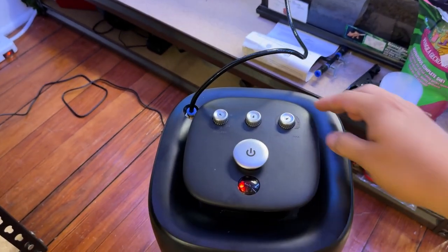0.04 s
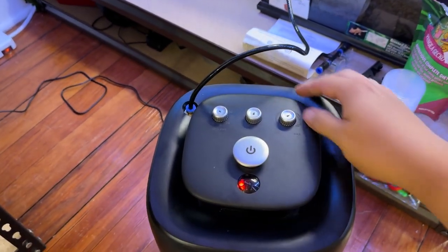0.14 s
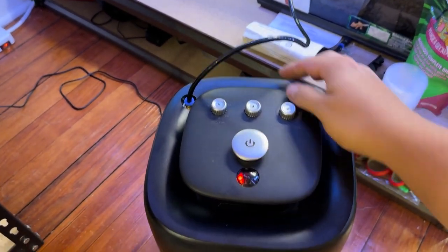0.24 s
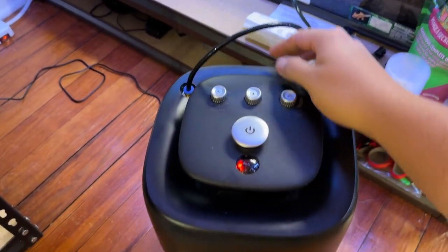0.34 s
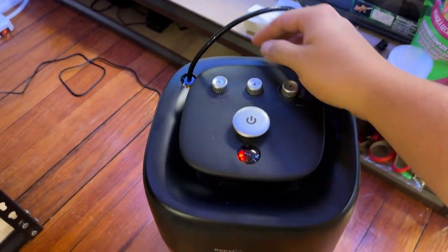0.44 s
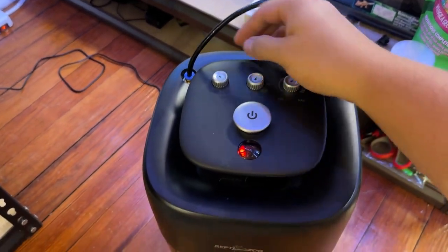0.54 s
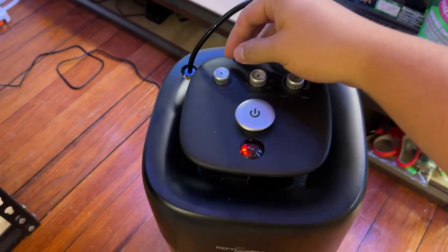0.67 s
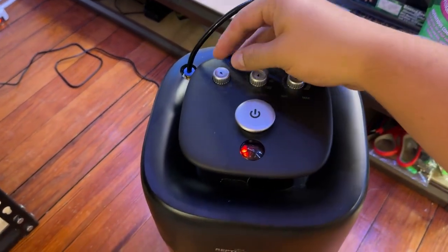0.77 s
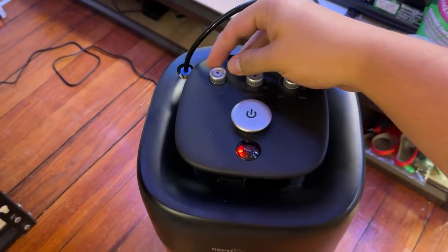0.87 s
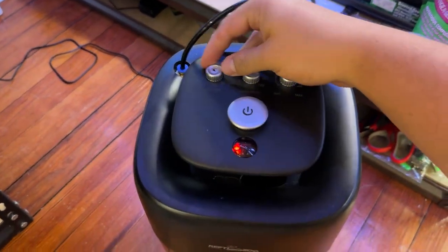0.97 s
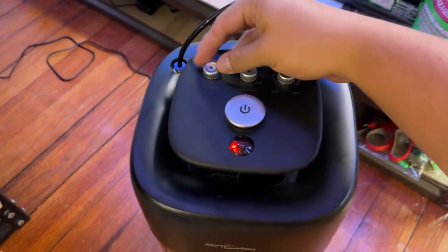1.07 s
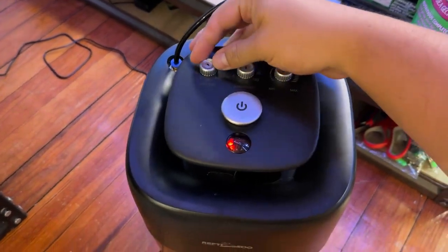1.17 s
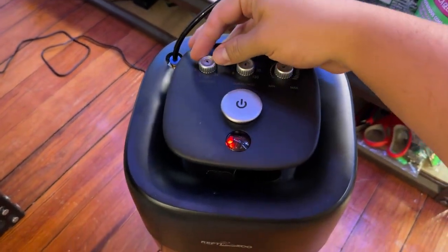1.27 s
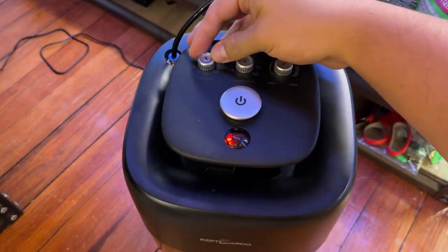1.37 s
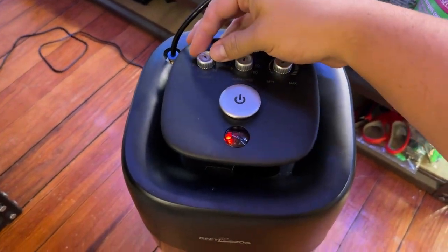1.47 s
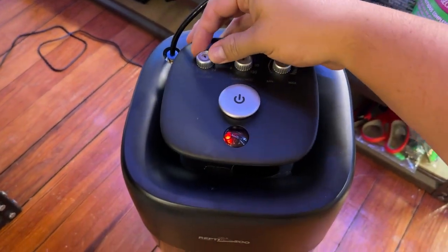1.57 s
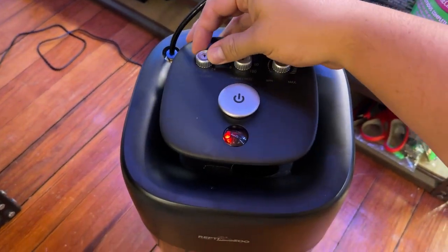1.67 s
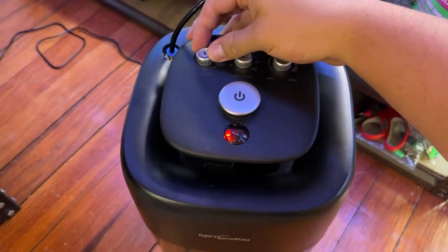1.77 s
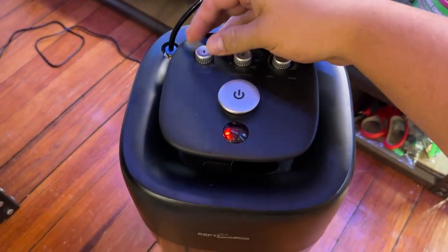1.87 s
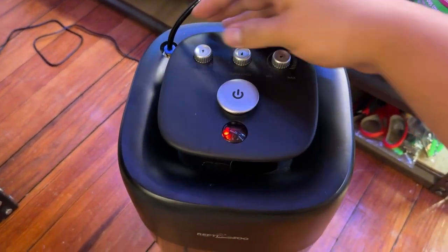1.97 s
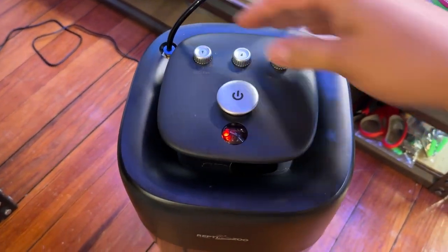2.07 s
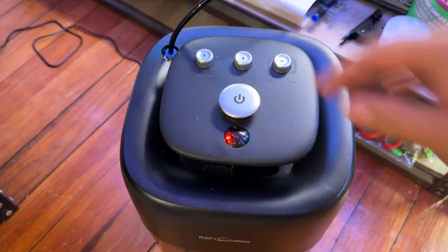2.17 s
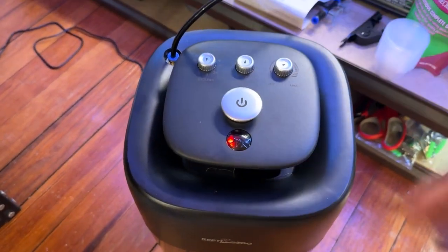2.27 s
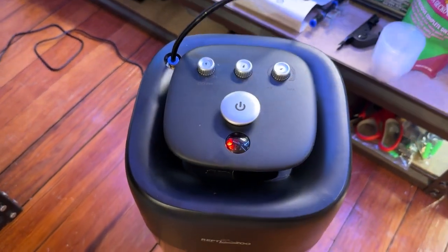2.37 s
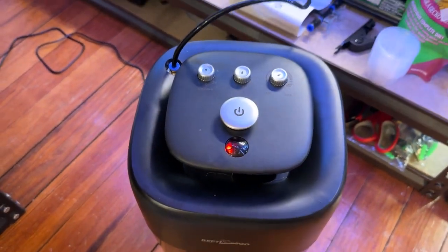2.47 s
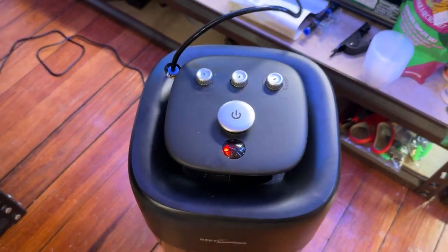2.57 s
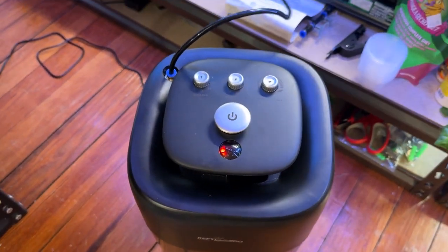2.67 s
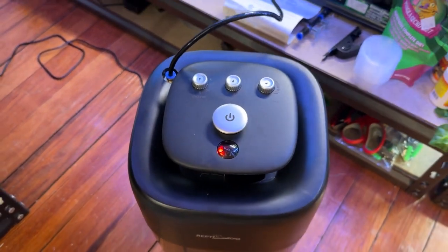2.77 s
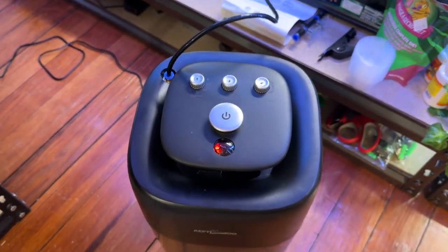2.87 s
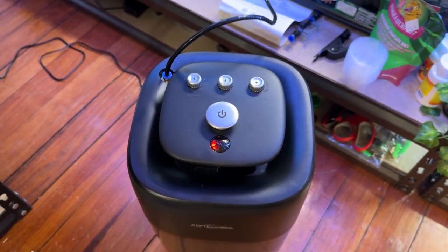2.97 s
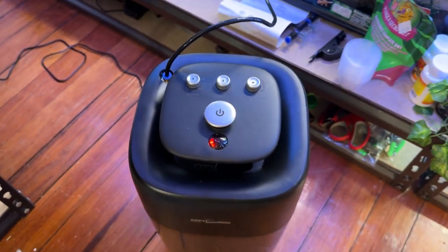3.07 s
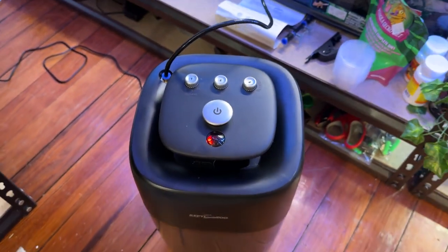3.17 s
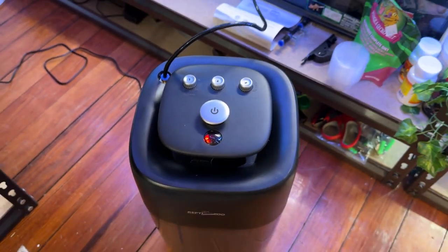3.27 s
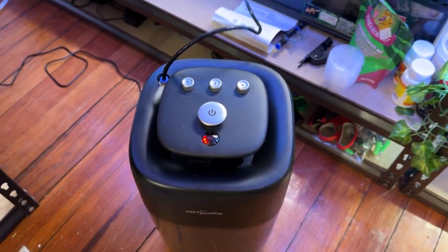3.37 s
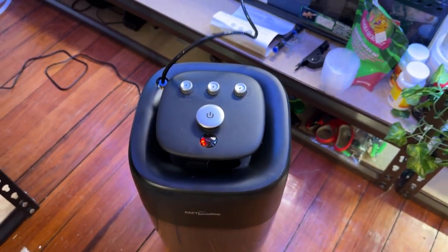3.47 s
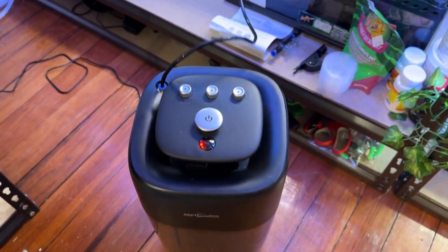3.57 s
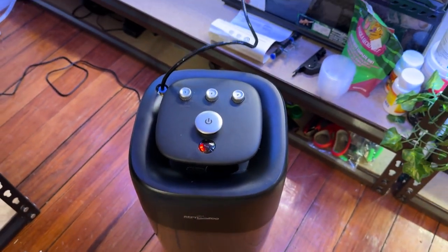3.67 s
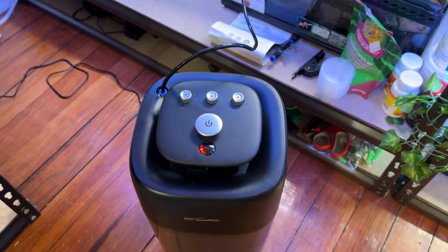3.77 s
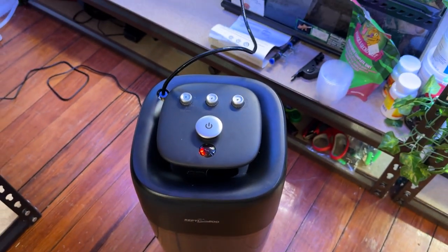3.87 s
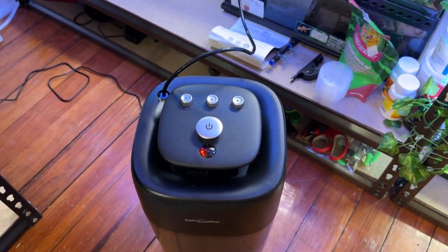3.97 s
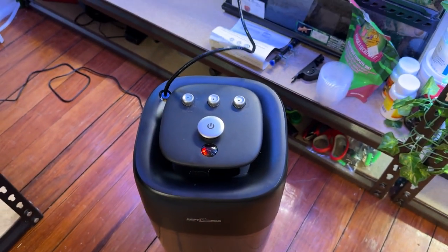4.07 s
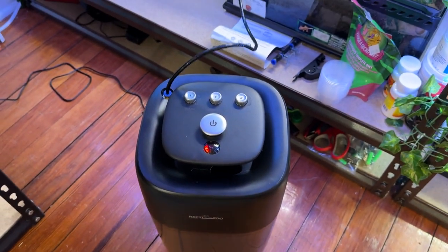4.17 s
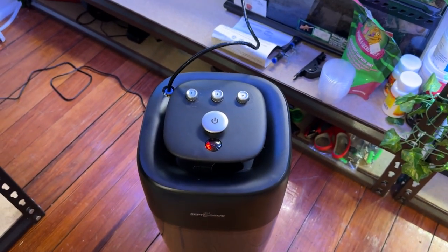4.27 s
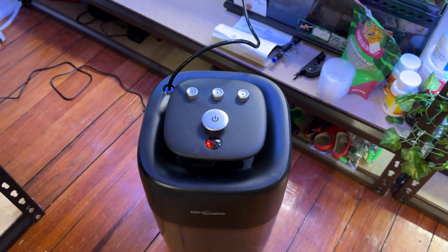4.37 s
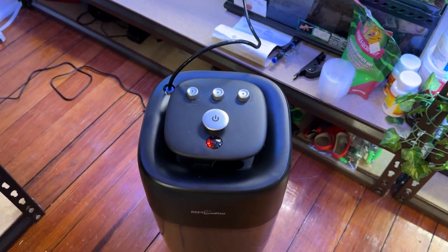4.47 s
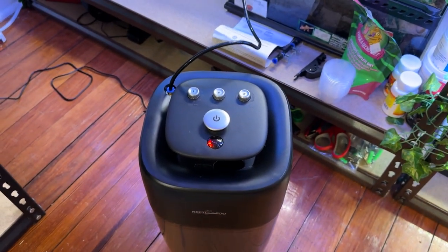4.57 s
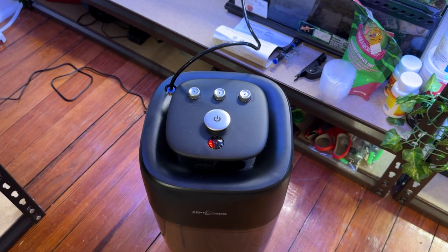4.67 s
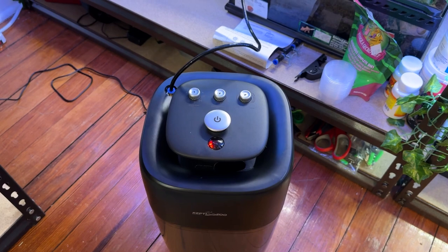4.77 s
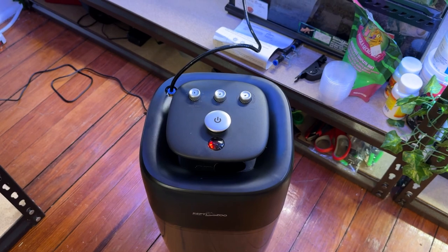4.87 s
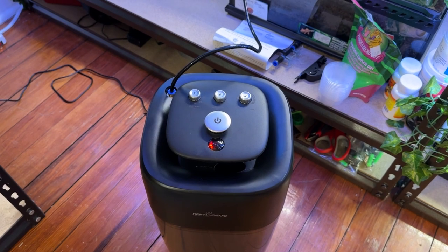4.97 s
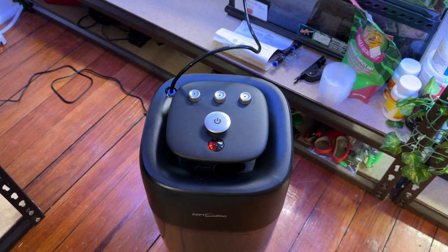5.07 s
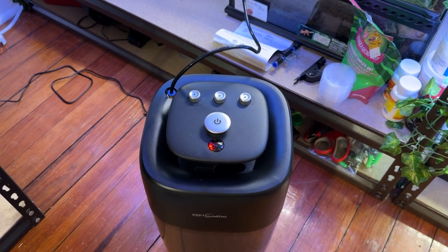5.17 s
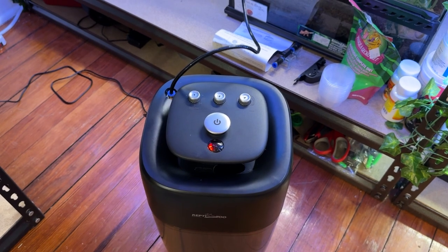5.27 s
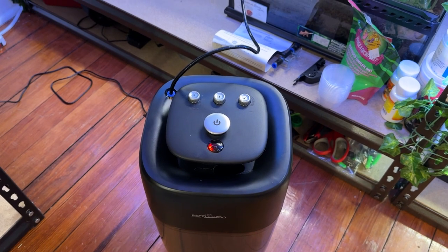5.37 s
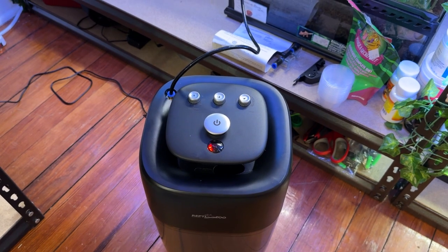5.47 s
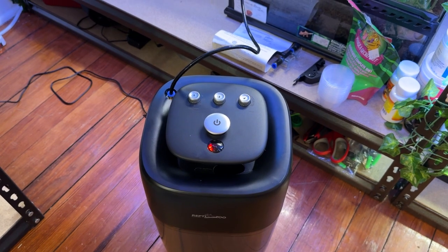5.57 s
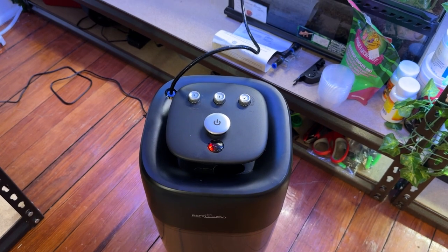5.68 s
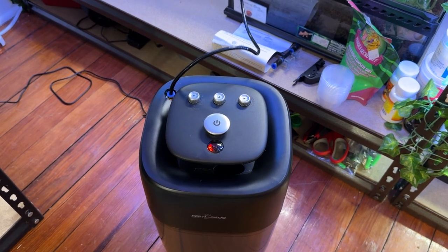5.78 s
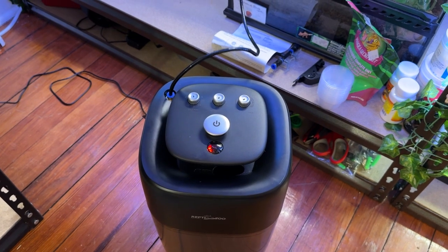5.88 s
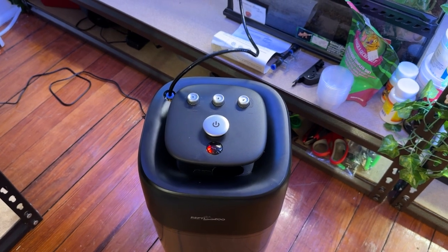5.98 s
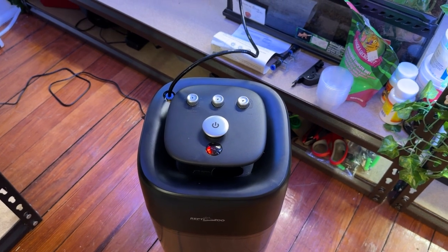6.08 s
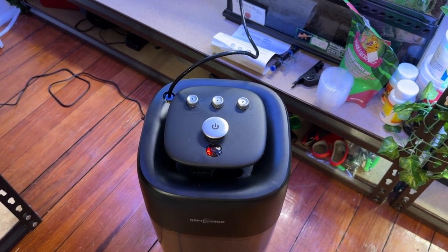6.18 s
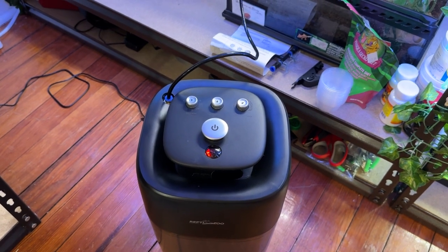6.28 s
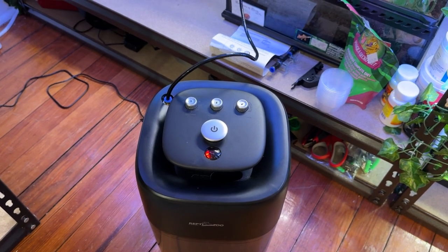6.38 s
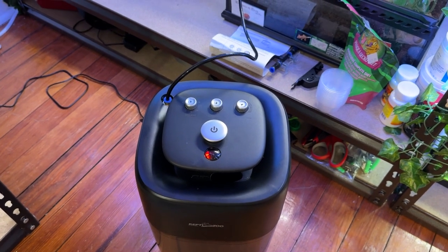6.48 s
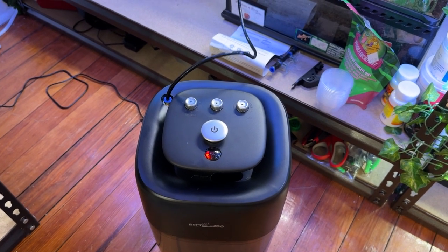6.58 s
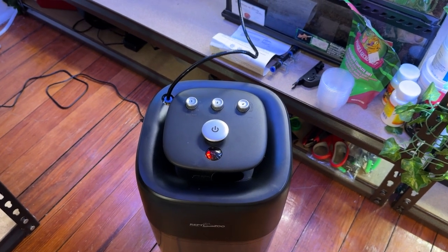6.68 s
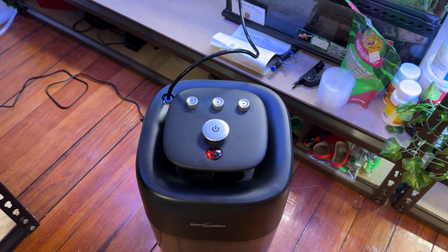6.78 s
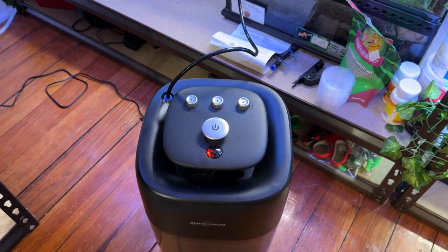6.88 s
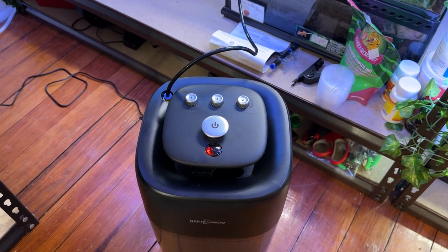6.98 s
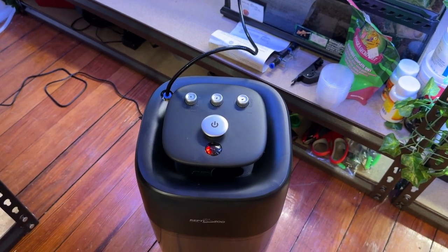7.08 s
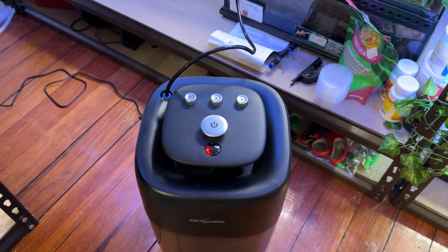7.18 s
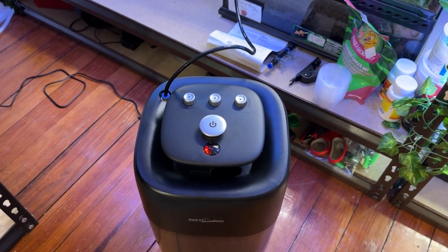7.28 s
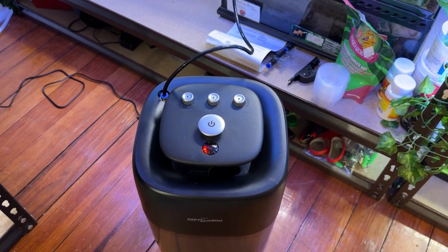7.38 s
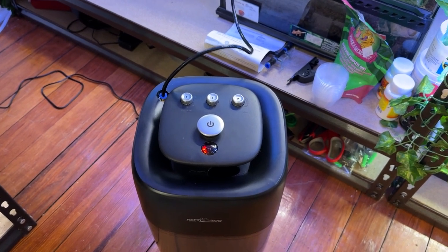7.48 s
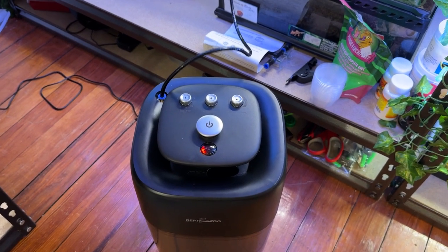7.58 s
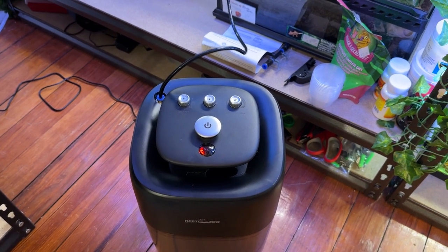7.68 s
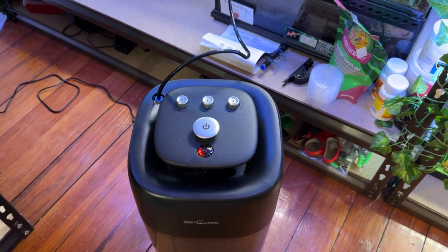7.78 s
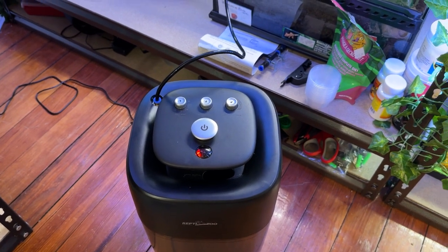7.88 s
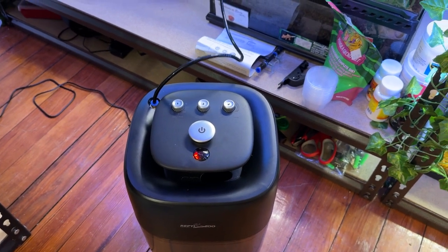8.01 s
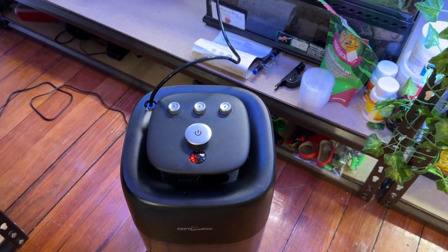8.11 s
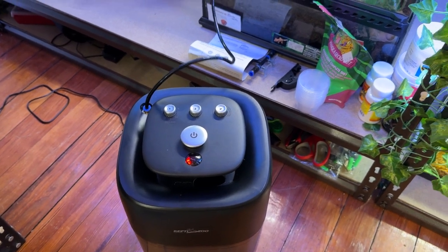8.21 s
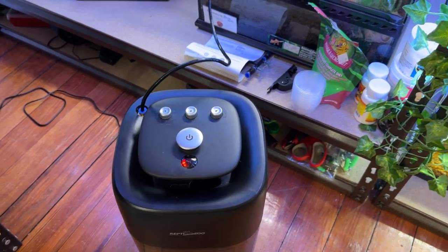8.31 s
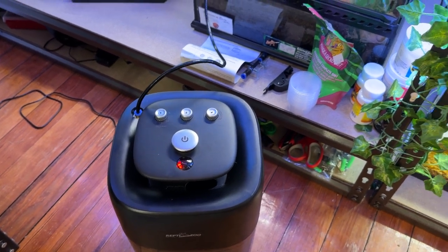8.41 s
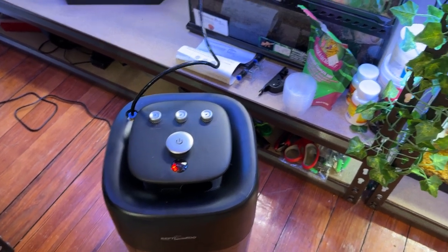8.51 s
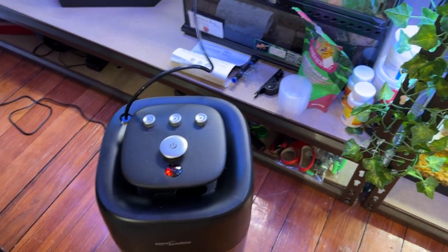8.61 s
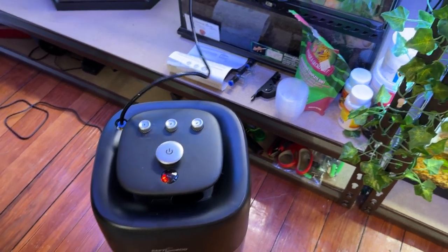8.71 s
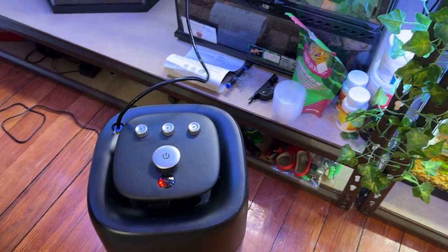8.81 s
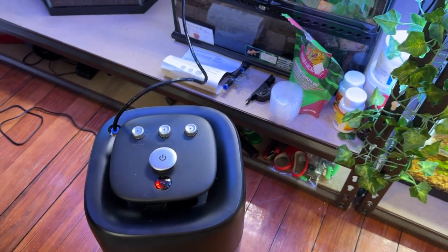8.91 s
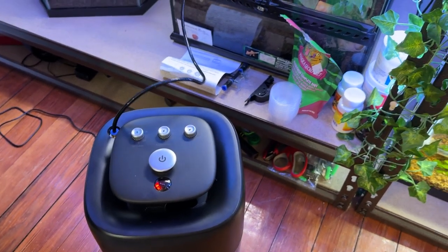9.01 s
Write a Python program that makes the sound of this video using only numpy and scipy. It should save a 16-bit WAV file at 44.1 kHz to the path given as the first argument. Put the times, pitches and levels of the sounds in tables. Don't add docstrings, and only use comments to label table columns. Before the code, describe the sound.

A small water pump in a plastic tub, heard close indoors. Quiet hum, tiny drips and light handling come first, then a crisp double clack and a dull jolt as the motor kicks in. Loose parts rattle for a second over a steady buzzing drone with light water trickling. After six seconds short spits of air and water become a continuous fine spray, with a soft thump near eight seconds and heavier pump knocking.

```python
import sys
import numpy as np
from scipy import signal
from scipy.fft import rfft
from scipy.io import wavfile
from scipy.ndimage import uniform_filter1d

SR = 44100
rng = np.random.default_rng(int(sys.argv[2]) if len(sys.argv) > 2 else 0)


def convert_level_to_amplitude(level_db):
    exponent = np.asarray(level_db, float) / 20
    return 10 ** exponent


def materialize(psi):
    bounded = np.clip(np.atleast_2d(psi).T, -1, 1)
    quanta = np.round(bounded * 32767).astype(np.int16)
    wavfile.write(sys.argv[1], SR, quanta)


N = 399105
TIME = np.arange(N) / SR

# pitch_hz, likeness (0 to 1)
SAME = [(60, 0.96), (130, 0.93), (290, 0.93), (640, 0.54), (1410, 0.25), (3100, 0.099), (6500, 0.1),
        (10000, 0.55)]
# pitch_hz, left_over_right_db
TILT = [(130, 1), (290, 1.5), (640, 1.0), (1410, 4), (3100, 5.5), (5500, 6), (8500, 2), (12000, -0.5)]
# time_s, distance_m
DISTANCE = [(0, 0.66), (2.55, 0.65), (3.7, 0.93), (9.05, 0.99)]
# time_s, turns_per_s
SPEED = [(1.9, 10.2), (3.0, 10.9), (6.3, 10.9), (7.0, 10.4), (7.64, 10.0), (8.0, 9.8), (8.257, 8.9),
         (8.4, 8.5), (9.05, 8.5)]


def evened(x):
    return x / np.sqrt(np.mean(x ** 2) + 1e-20)


def read(points, hz):
    f, value = np.transpose(points)
    return np.interp(np.log(hz + 1), np.log(f + 1), value)


def columns(rows):
    s, value = np.transpose(rows)
    return np.interp(TIME, s, value)


def banded(x, lo_hz, hi_hz):
    hz = np.fft.rfftfreq(N, 1 / SR)
    power = abs(rfft(x.mean(0))) ** 2 * (hz > lo_hz) * (hz < hi_hz)
    return x / np.sqrt(2 * power.sum() / N ** 2)


def slow(top_hz):
    t = TIME[::64]
    rates = np.geomspace(top_hz / 8, top_hz, num=20)
    waves = sum(np.sin(2 * np.pi * (f * t + rng.random())) for f in rates)
    return np.interp(TIME, t, evened(waves))


def resonate(x, hz, width):
    r = np.exp(-np.pi * width / SR)
    return 2 * signal.lfilter([1 - r], [1, -r * np.exp(2j * np.pi * hz / SR)], x).real


def panned(x, pan_db):
    return np.array([x * convert_level_to_amplitude(pan_db / 2), x * convert_level_to_amplitude(-pan_db / 2)])


def add(mix, s, sound):
    part = mix[..., round(s * SR):][..., :sound.shape[-1]]
    part += sound[..., :part.shape[-1]]


def noise(spectrum, same, patchy_db, size=1024, lag=((0, 0), (1, 0)), splash=0.):
    frames, hz = 4 * N // size + 5, np.fft.rfftfreq(size, 1 / SR)
    a, b, c, d, patches, chance = rng.standard_normal((frames, len(hz), 6)).T
    patches = uniform_filter1d(patches, size // 90, 0)
    patches = evened(uniform_filter1d(patches, 8000 // size, 1))
    drops = uniform_filter1d((chance > 2.9) * (1 + abs(c)), 15, 0)
    drops = uniform_filter1d(drops, 9, 0)
    drops = signal.lfilter([1], [1, -.85], drops, axis=1)
    like = np.clip(read(same, hz), -1, 1)[:, None]
    tilt = read(TILT, hz)[:, None]
    left = a + 1j * b
    right = like * left + np.sqrt(1 - like ** 2) * (c + 1j * d)
    turn = np.exp(1j * np.interp(hz, *np.transpose(lag)))[:, None]
    z = np.array([left * turn * convert_level_to_amplitude(tilt / 2), right * convert_level_to_amplitude(-tilt / 2)])
    z *= convert_level_to_amplitude(read(spectrum, hz)[:, None] + patchy_db * patches)
    z *= np.sqrt(1 + splash * drops / drops.mean())
    return signal.istft(z, nperseg=size, noverlap=size * 3 // 4)[1][:, :N]


def scuff(hz, width, count, like):
    raw = rng.standard_normal((2, count))
    a, b = (evened(resonate(resonate(v, hz, width), hz, 1.3 * width)) for v in raw)
    shared = panned(a, read(TILT, hz)) * [[1], [like]]
    return shared + [[0], [np.sqrt(1 - min(like, 1) ** 2)]] * b


def grainy(per_s, spread_db):
    size = convert_level_to_amplitude(spread_db * np.minimum(rng.exponential(1, N), 5)) * (rng.random(N) < per_s / SR)
    power = signal.oaconvolve(size ** 2, np.exp(-TIME[:1500] / 0.012))[:N]
    return evened(np.sqrt(0.11 + power))


def running():
    start_s, spin_up_s = 1.855, 0.052
    return np.clip((TIME - start_s) / spin_up_s, 0, 1)


def load():
    free_speed, loaded_speed = 10.9, 8.5
    return np.clip((free_speed - columns(SPEED)) / (free_speed - loaded_speed), 0, 1)


def squeaks():
    # start_s, length_s, level_db, pitch_hz
    creaks = [
        (.37, 0.38, -65, 1235),
        (.66, .2, -75, 1290),
        (0.86, 0.13, -70, 1290),
    ]
    glide_hz_per_s, width_hz = 148, 32
    out = np.zeros((2, N))
    fuzz = rng.standard_normal(N) + 1j * rng.standard_normal(N)
    fuzz = resonate(fuzz.real, 0, width_hz) + 1j * resonate(fuzz.imag, 0, width_hz)
    for s, length, db, hz in creaks:
        t = TIME[:round(length * SR)]
        tone = (fuzz[:len(t)] * np.exp(2j * np.pi * (hz * t + glide_hz_per_s * t ** 2 / 2))).real
        add(out, s, panned(convert_level_to_amplitude(db) * np.sin(np.pi * t / length) ** 1.2 * evened(tone), 7.0))
    return out


def room():
    # pitch_hz, level_db per Hz
    air = [(88, -29), (150, 5), (188, -14), (247, -4.5), (534, -16.5), (638, -21.5), (702, -26), (880, -23),
           (1810, -20.5), (3130, -29), (4610, -36), (5070, -54), (7000, -48), (9100, -80), (15400, -120)]
    # pitch_hz, level_db per Hz
    rumble = [(22, -22), (33, -15), (42, 12.5), (53, 11), (72, 5), (85, 8.5), (100, -0.5), (135, 6),
              (170, -13.5), (220, -35), (400, -72), (900, -130)]
    # pitch_hz, level_db, wavering_db
    hum = [(59, -54.5, 1), (120.9, -56, 2.5), (242, -64, 0), (363, -75.5, 1), (1830, -85, 3)]
    out = convert_level_to_amplitude(-63) * banded(noise(air, SAME, 2.4), 311, 15000)
    out += convert_level_to_amplitude(-53.5) * evened(noise(rumble, SAME, 2.6, size=4096))
    for hz, db, waver_db in hum:
        tone = np.sin(2 * np.pi * (hz * TIME + rng.random()))
        out += panned(np.sqrt(2) * convert_level_to_amplitude(db + waver_db * slow(8.0)) * tone, 1.0)
    return out + squeaks()


def water():
    # pitch_hz, level_db per Hz
    trickle = [(2500, -16), (4500, 4), (6200, 3), (8000, -1), (10200, 4), (12000, -9), (14000, -3.5),
               (15500, -10)]
    # start_s, peak_db, centre_hz
    splashes = [(0.0553, -53.5, 6150), (0.413, -56, 11300), (0.6449, -56, 10000), (0.6968, -55, 5690),
                (0.8869, -54.5, 6020), (1.0605, -53.5, 7640), (1.1628, -55, 10800), (1.4541, -64, 9100),
                (1.877, -50, 5910), (1.9081, -58, 5050), (1.9884, -55, 6350), (2.147, -54, 5660),
                (2.1839, -49, 6200), (2.2488, -53, 7310), (2.6898, -53, 8100), (3.6257, -50, 7320),
                (3.8716, -52, 5020), (3.895, -51, 10400), (4.0477, -49, 10400), (4.1934, -46.5, 6180),
                (4.2398, -51, 6060), (4.5027, -47.5, 10100), (4.8364, -53, 6710), (5.0295, -54, 7390),
                (5.2131, -53, 6650), (5.3554, -51, 6720), (5.3985, -51, 5900), (5.448, -50, 11400),
                (5.5453, -50, 11400), (5.5927, -50, 9160)]
    # start_s, peak_db, centre_hz
    specks = [(0.3064, -63, 9540), (0.4733, -62, 6240), (0.5945, -63, 9230), (0.7174, -54, 5680),
              (0.815, -65, 9760), (0.9802, -60, 9770), (1.3044, -62, 10200), (1.4686, -59, 9060),
              (2.0288, -54, 10200), (2.1126, -59, 13800), (2.2837, -57, 10100), (2.5097, -53, 9520),
              (2.7187, -56, 7040), (2.9194, -60, 5560), (3.1223, -59, 5500), (3.2685, -58, 9540),
              (3.3488, -51, 13400), (3.4394, -64, 8750), (4.146, -58, 7390), (4.7127, -60, 11400),
              (4.7606, -59, 5660), (4.806, -62, 7050), (4.9916, -60, 5650), (5.1741, -58, 6160)]
    # start_s, peak_db, pitch_hz, left_over_right_db
    drips = [(0.3306, -58, 3920, 6.0), (0.395, -53, 3960, 6), (0.815, -55, 3880, 6), (.347, -62, 3900, 6),
             (.68, -61, 3720, 6), (.85, -59, 3900, 6), (.95, -64, 4750, 5), (.995, -61, 4700, 5),
             (1.065, -60, 2300, 5), (1.054, -58, 2730, 9), (1.1972, -58, 3970, 3.5),
             (1.3658, -56, 4670, 4.0), (1.4935, -57, 3830, 9), (1.7794, -58, 4400, 4.0),
             (2.289, -53, 4770, 7), (3.1724, -61, 2880, 4.5), (4.298, -53, 3360, 9), (4.8319, -55, 4500, 2),
             (4.995, -53.5, 3900, 9), (5.115, -54.5, 4800, 4.0), (5.62, -57, 4750, 4), (2.74, -54, 4500, 4),
             (3.265, -55, 4500, 4), (5.3028, -53, 4750, 2), (5.4894, -53, 5930, 1), (5.668, -48.5, 3300, 9),
             (4.832, -53, 3400, 8), (6.5106, -52, 3900, 9)]
    still_db, stirred_db, loaded_db, ebb_db = -74, 5, -0.5, 1.5
    out = evened(noise(trickle, SAME, 2.2, size=256, splash=1.6))
    out *= convert_level_to_amplitude(still_db + stirred_db * running() + loaded_db * load() + ebb_db * slow(2.93))
    out *= grainy(70, 2.) ** .5
    t = TIME[:2500]
    for s, db, hz in splashes:
        add(out, s, scuff(hz, 1900, count=len(t), like=0.28) * convert_level_to_amplitude(db - 10 - 60 * t / 0.054))
    for s, db, hz in specks:
        shape = convert_level_to_amplitude(db - 7 - 60 * t / 0.019) + convert_level_to_amplitude(db - 17.5 - 60 * t / 0.11)
        add(out, s, scuff(hz, 3500, count=len(t), like=0.52) * shape)
    for s, db, hz, pan_db in drips:
        ring = np.sin(2 * np.pi * hz * t * (1 + .4 * t))
        ring = ring * convert_level_to_amplitude(db - 5 - 60 * t / .04) * (1 - np.exp(-t / .001))
        ragged = 1 + 0.5 * evened(uniform_filter1d(rng.standard_normal(len(t)), size=90))
        add(out, s, panned(ring * ragged, pan_db))
    return out


def ticks():
    ticks_per_s, tick_db, fade_s = 26, -69, .018
    out, t = np.zeros((2, N)), TIME[:1500]
    for hz in np.geomspace(3300, 12000, num=7):
        train = convert_level_to_amplitude(3. * np.minimum(rng.exponential(1, N), 2)) * (rng.random(N) < ticks_per_s / 7 / SR)
        burst = scuff(hz, 0.14 * hz, count=len(t), like=0.76) * convert_level_to_amplitude(tick_db - 60 * t / fade_s)
        out += signal.oaconvolve(train[None], burst, axes=1)[:, :N]
    return out


def walls(x):
    taps, at = np.zeros(3000), rng.integers(40, 3000, 14)
    taps[at] = .28 * rng.choice([-1., 1.], len(at)) * convert_level_to_amplitude(-60 * at / SR / .3)
    taps[0] = 1
    return signal.oaconvolve(x, taps[None] / np.linalg.norm(taps), axes=1)[:, :N]


def rustle():
    # start_s, level_db, length_s, centre_hz, width_hz
    rubs = [(0.124, -58.5, 0.066, 2200, 1300), (0.13, -62, 0.07, 1250, 400),
            (0.124, -63, 0.091, 10000, 5000), (2.016, -67, 0.036, 11100, 6000),
            (2.414, -65.5, 0.035, 6370, 3000), (3.332, -61.5, 0.043, 12200, 5000),
            (3.883, -66, 0.028, 10000, 6000), (3.955, -62, 0.03, 10300, 1600),
            (3.956, -62, .03, 13500, 4000), (4.04, -68, 0.04, 9700, 4000), (4.504, -72, 0.032, 12000, 5000),
            (1.298, -66, 0.15, 490, 200), (2.548, -71, .25, 2780, 1810), (2.851, -75, 1.1, 3300, 1400)]
    out, flutter = np.zeros((2, N)), grainy(1600, 1.6)
    for s, db, length, hz, width in rubs:
        t = TIME[:round((length + .06) * SR)]
        shape = np.clip(t / 0.003, 0, 1) * convert_level_to_amplitude(db - 420 * np.maximum(t - length, 0))
        add(out, s, scuff(hz, width, count=len(t), like=0.34) * shape)
    return out * flutter


def mist():
    # pitch_hz, level_db per Hz
    jet_colour = [(2060, -11.5), (3500, -6), (4520, -7), (5280, -1.5), (6320, -2), (7160, -2), (8010, -4.5),
                  (9420, -2.5), (10500, -3), (11900, -8.5), (14400, -8), (15500, -4)]
    # pitch_hz, level_db per Hz
    spray_colour = [(470, -34), (800, 4), (872, -6.5), (1310, -0.5), (1440, -5), (1560, -1), (2300, -3.5),
                    (3110, 1.5), (4500, -3), (5850, -2), (9900, -120)]
    # pitch_hz, likeness (0 to 1)
    jet_same = [(600, 0.14), (2000, 0.26), (5000, 0.25), (8000, 0.38), (11000, 0.68), (15000, 1)]
    # pitch_hz, left_lead_radians
    jet_lag = [(0, 0), (600, .3), (1380, -1.5), (2760, -5.7), (4570, -11.3), (6630, -17), (7900, -16.5),
               (9800, -6 * np.pi), (13200, -6 * np.pi), (15800, -21.6)]
    # time_s, level_db
    flow = [(5.55, -76), (5.9, -59), (6.05, -66.5), (6.6, -73.5), (7.05, -62.5), (7.35, -58), (7.73, -56.5),
            (8.45, -49.5), (9.05, -46.5)]
    # start_s, peak_db, rise_s, hold_s, fade_by_60_db_s
    spurts = [(6.097, -60, .004, 0.018, .3), (6.206, -58, 0.04, 0.092, 0.41),
              (6.364, -68.5, .01, 0.058, 0.2), (6.673, -64, .015, 0.02, 0.17),
              (6.79, -56, .002, 0.011, 0.27), (6.924, -54.5, 0.021, 0.041, 0.3),
              (7.413, -51.5, .01, 0.039, 1.1), (7.777, -61, .03, 0.15, 0.81), (8.257, -51, .003, .01, .23),
              (8.487, -53, .005, .02, .2), (8.6, -56, .005, .02, .2), (8.95, -54, .005, .02, .2)]
    spray_db, spray_steep, full_flow_db, gush_spray_db = -51.5, 3.3, -53, -13
    flow_db, opened = columns(flow), TIME > flow[0][0]
    bursts, t = np.zeros(N), TIME[:SR]
    for s, peak_db, rise, hold, t60 in spurts:
        fade_db = 60 * np.maximum(t - hold, 0) / t60
        add(bursts, s, np.minimum(t / rise, 1) * convert_level_to_amplitude(peak_db - fade_db))
    coarse = convert_level_to_amplitude(spray_db + spray_steep * np.minimum(flow_db - full_flow_db, 0))
    jet = banded(noise(jet_colour, jet_same, 1.6, size=256, lag=jet_lag), 2300, 17000)
    spray = banded(noise(spray_colour, jet_same, 1.4, size=512, lag=jet_lag), 880, 5300)
    hiss = np.hypot(convert_level_to_amplitude(flow_db), bursts) * jet * grainy(970, 0.5)
    return opened * (hiss + np.hypot(convert_level_to_amplitude(-3.5) * coarse, convert_level_to_amplitude(gush_spray_db) * bursts) * spray)


def switch():
    # start_s, peak_db, fade_by_60_db_s, centre_hz,
    # width_hz
    clicks = [(1.6527, -36.5, 0.034, 10300, 3500), (1.6532, -39, 0.031, 5800, 2200),
              (1.6535, -36.5, 0.046, 2210, 1800), (1.846, -43, 0.23, 840, 960),
              (1.878, -36, 0.09, 1100, 900), (1.66, -52, .16, 3500, 4000), (1.586, -53, 0.06, 1750, 470),
              (2.6, -50, .05, 1500, 500), (0.023, -59.5, 0.37, 3170, 574), (6.791, -46, 0.06, 5230, 700),
              (6.936, -52, 0.14, 6000, 1500)]
    # start_s, peak_db, pitch_hz, rise_s, fade_by_60_db_s
    jolts = [
        (1.703, -45, 80, 0.0081, 0.075),
        (1.73, -34, 71.3, 0.011, 0.22),
        (1.762, -31, 67.6, 0.015, 0.15),
        (1.85, -22.5, 183, 0.0104, 0.088),
        (1.90, -32.5, 60, 0.016, 0.27),
        (8.001, -39, 59, .03, 0.27),
        (7.88, -44, 142, 0.06, 0.62),
        (8.3, -35.5, 61.4, 0.025, 0.29),
        (8.55, -44, 69, 0.049, 0.85),
    ]
    out, t = np.zeros((2, N)), TIME[:12000]
    for s, db, t60, hz, width in clicks:
        shape = convert_level_to_amplitude(db - 7.0 - 60 * t / t60) + convert_level_to_amplitude(db - 24.0 - 60 * t / 0.3)
        add(out, s, scuff(hz, width, count=len(t), like=0.51) * shape * (1 - np.exp(-t / 0.00022)))
    for s, db, hz, rise, t60 in jolts:
        shape = np.clip(t / rise, 0, 1) ** 2 * convert_level_to_amplitude(db - 60 * np.maximum(t - rise, 0) / t60)
        add(out, s, panned(shape * np.sin(2 * np.pi * hz * (t - rise + 0.15 / hz)), 1.0))
    return out


def knocks():
    # start_s, peak_db, pitch_hz, hold_s
    fittings = [(1.844, -48, 880, .008), (1.845, -54, 2650, .006), (1.879, -41, 850, .008),
                (1.895, -48, 750, .015), (1.915, -55, 1500, 0.0086), (1.878, -42, 1880, 0.0075),
                (1.948, -52, 800, .008), (2.6, -56.5, 2300, .012), (2.648, -54, 1310, .015),
                (2.55, -59, 1500, .012), (2.183, -51, 1790, .008), (2.33, -57, 1700, .008),
                (2.392, -48, 605, .014), (2.49, -45, 595, 0.011), (2.527, -55, 1100, .006),
                (2.54, -50, 650, .01), (2.536, -61, 2830, 0.0054), (2.585, -50, 1080, .006),
                (2.586, -55, 2480, 0.0049), (2.587, -54, 1600, .005), (2.612, -49, 1200, 0.0061),
                (2.633, -51, 1420, .007), (2.637, -40.5, 680, 0.0082), (2.66, -49, 640, .012),
                (2.685, -53.5, 1460, .01), (2.686, -51, 600, .008), (2.769, -52, 1530, .008),
                (2.772, -56, 2630, .008), (2.777, -56, 1830, .01), (3.55, -58, 1140, .01),
                (4.18, -56, 1480, 0.0092), (4.099, -64, 2360, .01), (4.91, -63, 2340, .01),
                (5.1, -59, 1670, .01), (5.535, -62, 2690, .01), (5.64, -60, 1050, .012),
                (5.67, -57, 1490, .008), (5.68, -59, 1020, .012), (8.03, -52, 1420, .006)]
    rise_s, fade_s, clean_hz = 0.0021, 0.043, 800
    out, t = np.zeros((2, N)), TIME[:3000]
    for s, db, hz, hold in fittings:
        shape = np.minimum(t / rise_s, 1) * convert_level_to_amplitude(db - 60 * np.maximum(t - hold, 0) / fade_s)
        clean = min(clean_hz / hz, 1)
        ring = panned(np.sin(2 * np.pi * hz * t), read(TILT, hz))
        scrape = scuff(hz, .3 * hz, count=len(t), like=.4)
        add(out, s, shape * (clean * ring + (1.1 - clean) * scrape))
    return out


def whine():
    # multiple, level_db, wavering_db
    multiples = [(1, 1, 0.6), (2, -25, 1.), (3, -42, 2.), (4, -38, 1.5), (5, -44, 1.5), (7, -39, 2.5),
                 (8, -32, 2.5), (9, -38, 1.5), (10, -38, 1.5), (11, -45, 1.5), (12, -49, 1.5)]
    chop_hz = 244.15
    whine_db, sway_db = -39, 1.2
    far_pan_db, near_pan_db = .45, 4.
    metres, out = columns(DISTANCE), 0
    near = running() * convert_level_to_amplitude(whine_db + sway_db * load() ** .5 * slow(3.5)) / metres
    for order, rel_db, waver_db in multiples:
        level = convert_level_to_amplitude(rel_db + waver_db * slow(30.)) / metres ** (0.048 * order)
        phase = 2 * np.pi * (round(order) * chop_hz * TIME + rng.random())
        apart = 0.1 * order
        out = out + level * np.array([np.sin(phase + apart), np.sin(phase - apart)])
    pan_db = far_pan_db + near_pan_db * (metres[-1] - metres)
    return np.sqrt(2) * near * out * convert_level_to_amplitude(np.outer([.5, -.5], pan_db))


def count_strokes():
    strokes = np.cumsum(6 * columns(SPEED)) / SR
    return strokes - strokes[round(8.255 * SR)]


def piston_knock(strokes):
    light_db = [-5., -7., 0., -6., -8., -6.]
    heavy_db = [0., -7., -2.5, -6., -8., -5.]
    # pitch_hz, width_hz, level_db
    tub = [(483, 35, -4), (592, 60, 10), (656, 30, 12), (705, 60, 6)]
    shift_load, jitter_s = .3, .0016
    at = np.flatnonzero(np.diff(np.floor(strokes))) + 1
    piston = np.floor(strokes[at]).astype(int) % 6
    shift = np.clip(load()[at] / shift_load, 0, 1) ** 4
    stroke_db = (1 - shift) * np.take(light_db, piston) + shift * np.take(heavy_db, piston)
    uneven = 1.3 + .3 * load()
    early = np.round(jitter_s * SR * rng.standard_normal(len(at))).astype(int).clip(-300, 0)
    blows = np.zeros(N)
    blows[at + early] = convert_level_to_amplitude(uneven[at] * stroke_db + rng.uniform(-2.2, 2.2, len(at)))
    scuffs = signal.oaconvolve(blows, np.exp(-TIME[:900] / 0.0071))[:N] * rng.standard_normal((2, N))
    drive = evened(blows) + .55 * evened(scuffs)
    ring = [sum(convert_level_to_amplitude(db) * evened(resonate(resonate(d, hz, w), hz, 2.6 * w)) for hz, w, db in tub)
            for d in drive]
    return np.array([ring[0], 0.1 * ring[0] + 0.87 * ring[1]])


def valve_rattle(strokes):
    slap_db, slap_strokes = -2, .5
    since = strokes % 6
    rattle = scuff(1410, 870, count=N, like=0.48) + 0.89 * scuff(470, 230, count=N, like=0.53)
    rattle *= evened(np.exp(-since / 2.0))
    slap = scuff(2200, 2500, count=N, like=0.41) * evened(np.exp(-since / slap_strokes))
    return rattle + convert_level_to_amplitude(slap_db) * slap


def housing_throb(strokes):
    # pitch_hz, level_db per Hz
    body = [(110, -30), (140, -14), (168, -6), (184, -2), (198, -11), (215, 1), (229, -7), (258, -6),
            (280, -16), (320, -18), (360, -15), (400, -23), (550, -22), (740, -32), (860, -37), (1000, -30),
            (1950, -25.5), (2200, -38), (2700, -35), (3500, -39), (4200, -48), (6000, -60)]
    throb = 1 + 0.25 * np.cos(2 * np.pi * strokes)
    return banded(noise(body, SAME, 1.43, size=4096) * throb, 143, 231)


def pistons():
    priming_db, primed_s, settle_db_per_s = -59.5, 2.72, 18
    pocket_s, pocket_length_s, pocket_db = 3.55, 0.6, -60
    knock_db, knock_rise_db, knock_load, knock_damp_db = -74, 17.5, 0.18, 4
    valve_db, valve_rise_db, valve_load = -84, 22, 0.78
    housing_db, housing_load_db = -51.5, 1.5
    strokes, pressure = count_strokes(), load()
    priming = convert_level_to_amplitude(priming_db - settle_db_per_s * np.maximum(TIME - primed_s, 0))
    pocket = np.sin(np.pi * np.clip((TIME - pocket_s) / pocket_length_s, 0, 1))
    priming = priming + convert_level_to_amplitude(pocket_db) * pocket
    rise_db = knock_rise_db * np.minimum(pressure / knock_load, 1)
    working = convert_level_to_amplitude(knock_db + rise_db - knock_damp_db * pressure) * (TIME > primed_s)
    valve = convert_level_to_amplitude(valve_db + valve_rise_db * np.minimum(pressure / valve_load, 1))
    housing = convert_level_to_amplitude(housing_db + housing_load_db * pressure - 3.5) / columns(DISTANCE) ** 0.7
    knock = np.hypot(priming, working) * convert_level_to_amplitude(-1.5) * evened(piston_knock(strokes))
    return running() * (knock + valve * valve_rattle(strokes) + housing * housing_throb(strokes))


def scene():
    wet = walls(water() + mist() + (.35 + .55 * running()) * ticks())
    return room() + wet + rustle() + switch() + knocks() + whine() + pistons()


def roll_off(x):
    return signal.sosfilt(signal.butter(12, 16190, fs=SR, output="sos"), x)


def record(dry):
    cut = signal.sosfilt(signal.butter(2, 34., "high", fs=SR, output="sos"), dry)
    edge = signal.firwin(511, 15720, window=("kaiser", 9), fs=SR)
    mix = signal.oaconvolve(cut, edge[None], "same")
    return roll_off(mix)


dry = scene()
out = record(dry)
materialize(out)
```